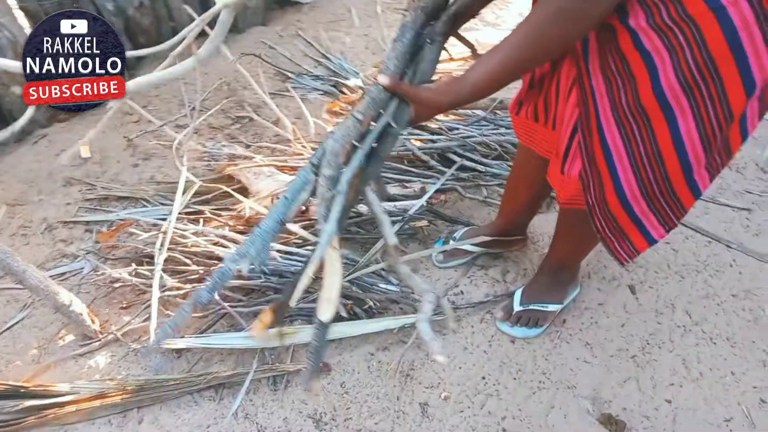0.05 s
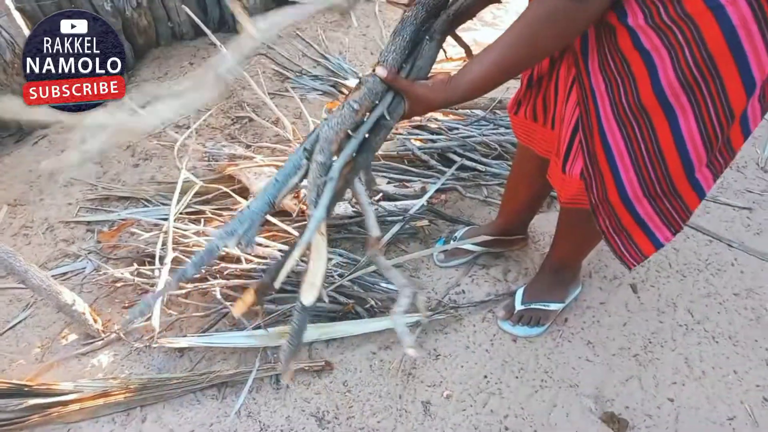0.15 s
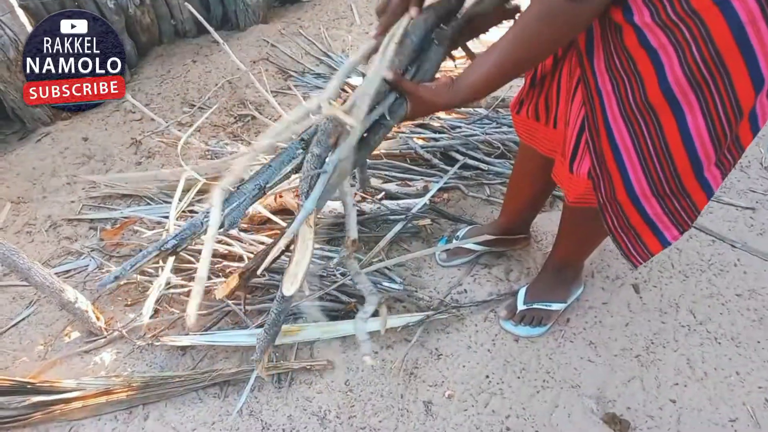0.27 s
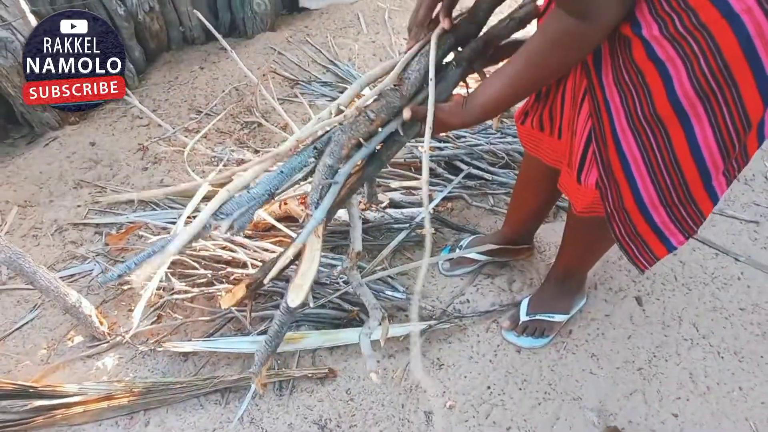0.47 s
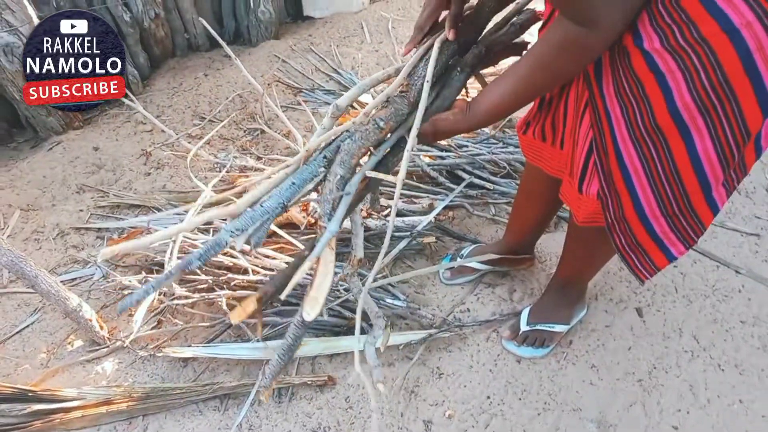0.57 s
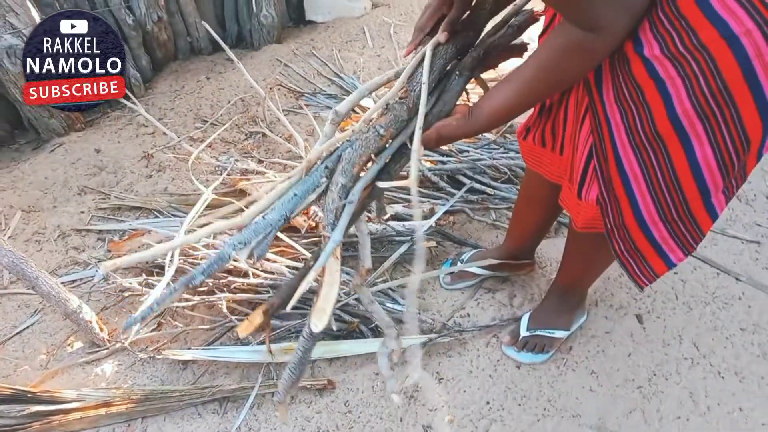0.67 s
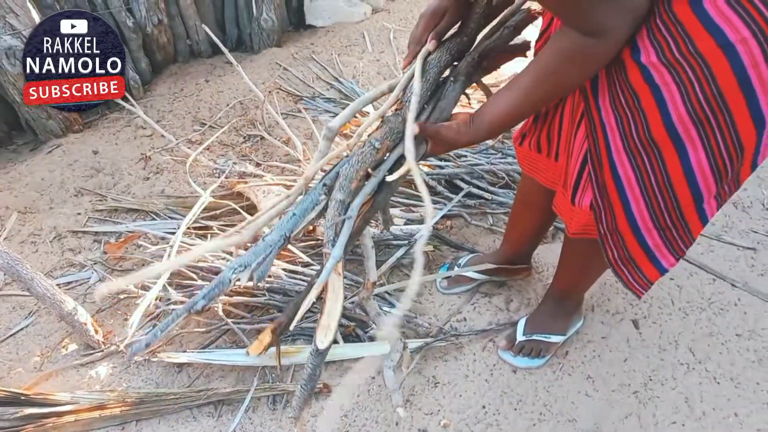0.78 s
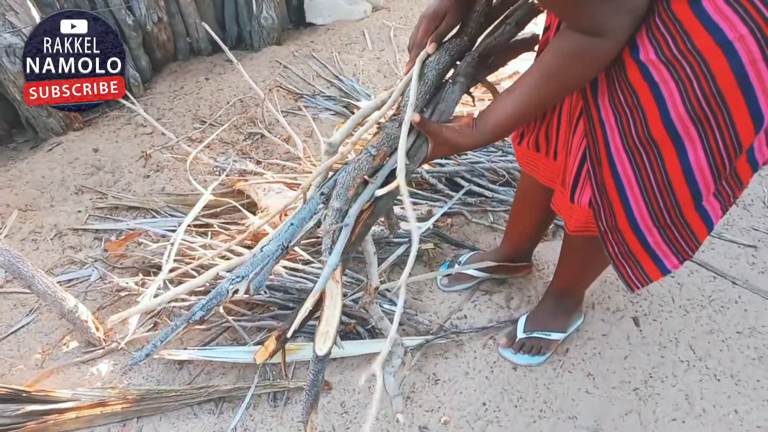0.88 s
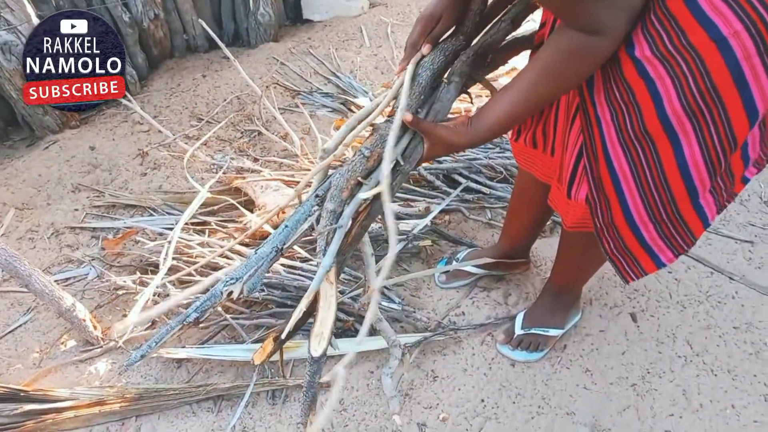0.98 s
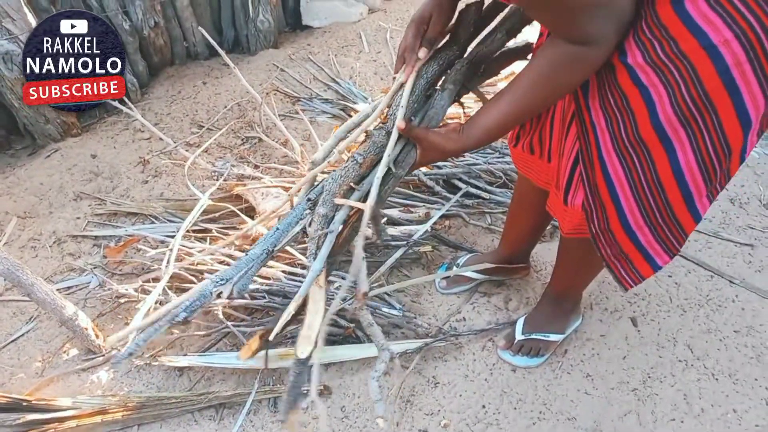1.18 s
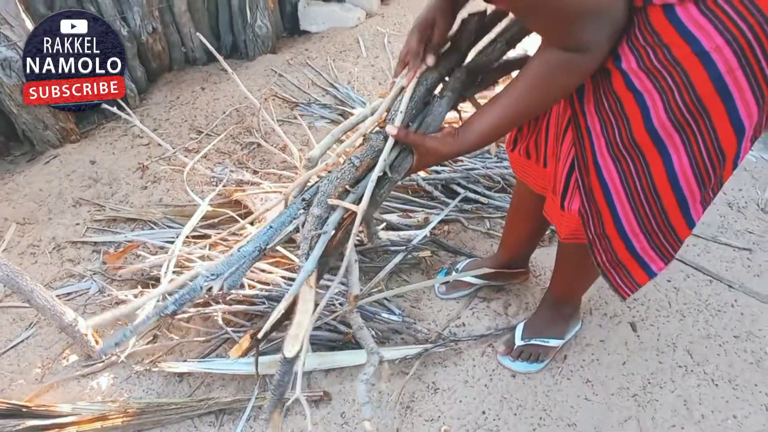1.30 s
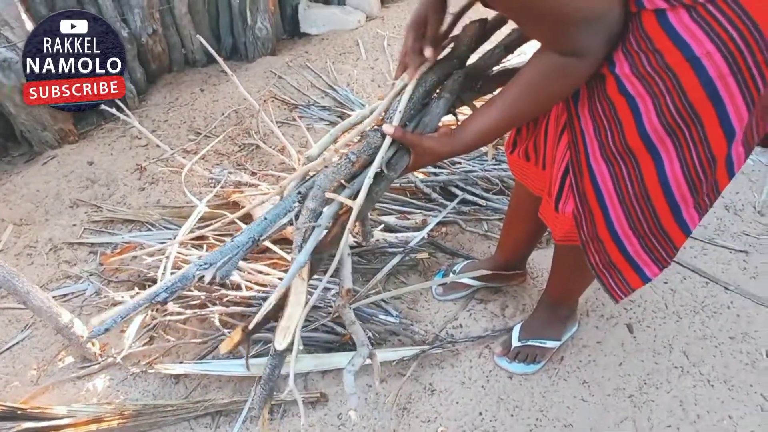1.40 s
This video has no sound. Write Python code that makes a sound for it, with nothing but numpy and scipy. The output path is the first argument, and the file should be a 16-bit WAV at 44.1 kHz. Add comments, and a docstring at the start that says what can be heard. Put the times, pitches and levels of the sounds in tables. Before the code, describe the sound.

Firewood sticks knock and scrape together in a short burst outdoors. Afterwards thin twigs tick and rustle quietly, with dull scuffs on sandy ground and a last light knock, while wind buffets the microphone.

```python
"""Dry firewood sticks are gathered into a bundle in an open yard, over a faint outdoor hiss.
Twigs rustle and the sandy ground is scuffed. At 0.22 s a sharp clack, then a quick clatter and scrape
as the sticks settle: each knock cracks and rings the wood's modes, sliding bark catches in tiny grains.
From 0.33 s a breeze buffets the microphone with low thumps. Twigs tick and rustle on, with dull scuffs
at 0.84 and 1.22 s and a last light knock at 1.31 s."""
import sys
import numpy as np
from scipy import signal
from scipy.fft import rfft, irfft, next_fast_len
from scipy.io import wavfile
from scipy.ndimage import uniform_filter1d, map_coordinates

SR = 44100
rng = np.random.default_rng(int(sys.argv[2]) if len(sys.argv) > 2 else 0)


def digitize_waveform(pressure):
    """Quantize a signal to 16-bit integers and store it at the path in sys.argv[1].

    Rows of a 2-D input are taken as channels; values are limited to [-1, 1].
    """
    field = np.atleast_2d(pressure).T
    bounded = np.clip(field, -1, 1)
    quanta = np.round(bounded * 32767).astype(np.int16)
    wavfile.write(sys.argv[1], SR, quanta)


N = 63945
WOOD_WIDTH, TWIG_PAN_DB = 0.79, 5


def undb(db):
    """Decibels to gain."""
    return 10 ** (np.asarray(db) / 20)


def unit(x):
    """Scale to rms 1."""
    return x / np.sqrt(np.mean(x ** 2))


def unit_energy(x):
    """Scale each channel to energy 1."""
    return x / np.sqrt(np.sum(x ** 2, axis=-1, keepdims=True))


def blow(x):
    """Scale each channel to the energy of 10 ms at rms 1."""
    return unit_energy(x) * np.sqrt(SR / 100)


def clock():
    """Sample times in s."""
    return np.arange(N) / SR


def curve(points):
    """Gain over time from (time [s], level [dB]) points."""
    return undb(np.interp(clock(), *np.array(points).T))


def fade(t, t60_s):
    """Exponential decay from t = 0."""
    return (t >= 0) * np.exp(-np.log(1000) * np.maximum(t, 0) / t60_s)


def colour(x, points):
    """Minimum-phase filter through (frequency [Hz], gain [dB]) points; -18 dB/octave outside."""
    hz, db = np.array(points).T
    size = 2 * next_fast_len(N)
    octave = np.log2(np.maximum(np.arange(size // 2 + 1) * SR / size, 1))
    outside_oct = np.maximum(np.log2(hz[0]) - octave, octave - np.log2(hz[-1]))
    gain_db = np.interp(octave, np.log2(hz), db) - 18 * np.clip(outside_oct, 0, 4)
    cepstrum = irfft(np.log(undb(gain_db)))
    cepstrum[1:size // 2] *= 2
    cepstrum[size // 2 + 1:] = 0
    return irfft(rfft(x, size) * np.exp(rfft(cepstrum)))[..., :N]


def convolve(x, response):
    """Apply an impulse response."""
    return signal.fftconvolve(x, response, axes=-1)[..., :N]


def spread(pair, width=WOOD_WIDTH):
    """Mid/side to left/right; width is the side gain."""
    return pair[0] + width * pair[1] * np.array([[1], [-1]])


def pan(db):
    """Gains favouring the left by db."""
    return undb(np.array([[db], [-db]]) / 2)


def noise():
    """Two independent white noises."""
    return rng.standard_normal((2, N))


def add(out, x, start_s):
    """Mix x into out from start_s."""
    i = int(np.clip(start_s * SR, 0, N - 1))
    out[:, i:] += x[:, :N - i]


def patchy(x, depth_db, patch_s=.05, patch_hz=900, size=512):
    """The colour of rubbing wanders as different twigs touch: random gain per time-frequency patch."""
    spectrum = signal.stft(x, nperseg=size)[2]
    field = rng.standard_normal(spectrum.shape[1:])
    for _ in range(2):
        field = uniform_filter1d(field, int(patch_hz * size / SR), axis=0)
        field = uniform_filter1d(field, int(patch_s * SR * 2 / size), axis=1)
    return signal.istft(spectrum * undb(depth_db * unit(field)), nperseg=size)[1][:, :N]


def friction(spectrum, grains_per_s=2000, patch_db=3.5, scatter_db=1.5, grain_t60_s=.007):
    """Rough surfaces rub in dense tiny catches, a few stronger, each a puff of noise."""
    catches = rng.random(N) < grains_per_s / SR
    strength = undb(scatter_db * np.minimum(rng.exponential(size=N), 5))
    power = convolve((catches * strength) ** 2, fade(clock(), grain_t60_s) ** 2)
    grains = patchy(noise() * np.sqrt(np.abs(power)), patch_db)
    return spread(unit(colour(grains, spectrum)))


def air(level_db=-74.5):
    """Faint steady outdoor hiss."""
    # hiss spectrum (frequency [Hz], gain [dB])
    spectrum = [(100, 0.5), (400, -24.5), (1000, -22), (2500, -21.5), (5000, -31), (8000, -47),
                (12500, -45), (16000, -58)]
    return undb(level_db) * spread(unit(colour(noise(), spectrum)), width=1)


def wind(eddy_sigma_cycles=0.52, skew_rad=0.5):
    """Low turbulence on the microphone ports; single eddies thump, out of step between the ports."""
    # breeze strength (time [s], level [dB])
    breeze = [(0, -72), (.05, -66.5), (.13, -63.5), (.17, -72), (.26, -68), (.31, -64), (.335, -41.5),
              (.36, -56.5), (.39, -49), (.43, -53.5), (.475, -38), (.56, -39.5), (.62, -44), (.65, -61),
              (.715, -68), (.75, -43), (.87, -47.5), (.95, -53), (1.08, -51.5), (1.13, -61.5),
              (1.23, -65.5), (1.26, -69), (1.32, -58.5), (1.41, -62.5), (1.449, -50.5)]
    # turbulence spectrum (frequency [Hz], gain [dB])
    spectrum = [(15, -49.5), (25, -20), (83, 0), (126, -6), (288, -17), (407, -30.5), (560, -35.5),
                (697, -49), (900, -58), (1170, -67), (1980, -120)]
    # eddies (time [s], peak [dB], pitch [Hz])
    eddies = [(0.049, -53, 85), (0.334, -36, 110), (.46, -37, 109), (0.487, -31, 80), (0.515, -30, 188),
              (0.561, -22.5, 113.6), (0.582, -35, 255), (0.62, -28.5, 96.4), (0.769, -25.5, 123),
              (.770, -40, 351), (0.861, -31.5, 133), (0.886, -41.5, 249), (.923, -39, 175),
              (0.979, -32, 115.6), (1.049, -34.5, 90.7), (1.088, -40.5, 134), (1.163, -39.5, 94.4),
              (1.293, -45, 95)]
    out = spread(unit(colour(noise(), spectrum)), width=0.88) * curve(breeze)
    for at_s, peak_db, hz in eddies:
        cycles = (clock() - at_s) * hz
        envelope = np.exp(-.5 * (cycles / eddy_sigma_cycles) ** 2)
        phase_rad = 2 * np.pi * rng.random() + skew_rad * rng.choice([-1, 1]) * np.array([[1], [-1]])
        out += undb(peak_db) * envelope * np.sin(2 * np.pi * cycles + phase_rad)
    return out * pan(-3)


def yard_echo(x, level_db=-8, delay_s=0.0065, t60_s=0.13):
    """Short, thin scatter from the ground and a log fence."""
    # echo spectrum (frequency [Hz], gain [dB])
    spectrum = [(200, -15.5), (1000, 3.5), (5000, -3.5), (8000, -10), (16000, 6.5)]
    tail = colour(noise() * fade(clock() - delay_s, t60_s), spectrum)
    return undb(level_db) * convolve(x, unit_energy(tail))


def sand_scuffs():
    """Dull friction over sandy ground, swelling and dying away."""
    # scuffs (peak time [s], level [dB], attack [s], t60 [s])
    scuffs = [(0.015, -62.5, 0.03, 0.22), (0.136, -61, 0.01, .28), (0.835, -54.5, 0.0063, 0.14),
              (1.217, -65, 0.0086, 0.24)]
    # scuff spectrum (frequency [Hz], gain [dB])
    spectrum = [(300, 16), (450, 22), (750, 12.5), (1100, 13.5), (1800, 15), (4000, 4.5), (16000, -20)]
    t, envelope = clock(), np.zeros(N)
    for at_s, level_db, attack_s, t60_s in scuffs:
        swell = np.exp(-np.abs(t - at_s) / attack_s)
        envelope += undb(level_db) * np.where(t < at_s, swell, fade(t - at_s, t60_s))
    return friction(spectrum) * envelope


def bundle_rustle():
    """Twigs rub in the carried bundle: fine, dense grains."""
    # rustle strength (time [s], level [dB])
    levels = [(0, -65.5), (.09, -70), (.14, -61.5), (.21, -70.5), (.5, -63.5), (.63, -64.5), (.66, -67.5),
              (.75, -78), (.78, -67), (.86, -68), (.94, -76.5), (1.0, -65.5), (1.09, -64), (1.125, -74),
              (1.155, -61), (1.19, -76), (1.23, -65), (1.29, -81.5), (1.32, -69), (1.39, -75), (1.45, -64)]
    # twig spectrum (frequency [Hz], gain [dB])
    spectrum = [(400, 3), (900, -15), (1300, 1), (2000, -9.5), (3500, 1.5), (5300, 3), (7000, 1),
                (8200, -8.5), (11500, -1), (16000, -5.5)]
    return friction(spectrum, grains_per_s=6000, patch_db=1.2) * curve(levels) * pan(TWIG_PAN_DB)


def twig_ticks():
    """Thin twigs flick against each other: brief bright noise bursts."""
    # flicks (time [s], level [dB], t60 [s])
    ticks = [(0.235, -55.5, 0.02), (0.3441, -53.5, 0.013), (0.408, -62, 0.017), (0.506, -71, 0.015),
             (0.519, -74, 0.011), (0.534, -61, 0.017), (0.627, -59.5, 0.036), (0.99, -66.5, 0.014),
             (1.155, -64.5, 0.027), (1.274, -70.5, 0.006), (1.402, -70, 0.0074), (1.435, -64, 0.013)]
    # tick spectrum (frequency [Hz], gain [dB])
    spectrum = [(1000, -5), (3000, 3.5), (5200, 18.5), (8000, 7), (10800, 10.5), (16000, -7)]
    out = np.zeros((2, N))
    for start_s, level_db, t60_s in ticks:
        burst = colour(noise() * fade(clock(), t60_s), spectrum)
        add(out, undb(level_db) * spread(blow(burst)), start_s)
    return out * pan(TWIG_PAN_DB)


def bark_scrape():
    """Bark slides over bark as the sticks settle."""
    # scrape strength (time [s], level [dB])
    levels = [(.222, -110), (.232, -57), (.258, -53.5), (.272, -46.5), (.308, -46), (.322, -49),
              (.338, -67), (.362, -47.5), (.41, -57.5), (.435, -54), (.45, -50.5), (.5, -61), (.58, -70),
              (.69, -70), (.75, -91), (.79, -87), (.85, -67.5), (.95, -79.5), (1.02, -67.5), (1.09, -68),
              (1.14, -78)]
    # bark spectrum (frequency [Hz], gain [dB])
    spectrum = [(250, -5), (600, 0), (1100, -4), (1900, -4.5), (2400, -2.5), (4400, -3.5), (5400, -1.5),
                (6500, -18.5), (8200, -19), (11000, -22.5), (16000, -19)]
    return friction(spectrum) * curve(levels)


def stick_ring(pitch_hz, width_oct, t60_scale, detune=0.01, rise_s=.0003):
    """Mid/side ringing of a stick's modes around its pitch; the wood gives, so the ring builds up."""
    # stick modes (frequency [Hz], level [dB], t60 [s])
    modes = [(447, 1, 0.029), (841, -16, 0.23), (1079, -0.5, 0.06), (1342, 2, 0.11), (1790, 3, 0.14),
             (2233, 3, 0.061), (2410, 5.5, 0.13), (2770, 0.5, 0.12), (3247, -2.5, 0.14), (3600, 4, 0.088),
             (3876, 5.5, 0.072), (4580, 5, 0.09), (5004, 10, 0.094), (6000, 6.5, 0.032)]
    mode_hz, mode_db, t60_s = np.array(modes).T[:, :, None]
    t = clock()[:N // 8]
    chance = rng.standard_normal((3, len(modes), 1))
    tuning, polarity = 1 + detune * chance[0], np.sign(chance[1:])
    # stick size: all modes shift until the nearest lies on the pitch
    hz = mode_hz * pitch_hz / mode_hz[np.argmin(np.abs(mode_hz - pitch_hz))]
    weight = undb(mode_db) * np.exp(-.5 * (np.log2(hz / pitch_hz) / width_oct) ** 2)
    swing = polarity * np.sin(2 * np.pi * hz * tuning * t)
    ring = np.sum(weight * fade(t, t60_s * t60_scale) * swing, axis=1)
    return ring * (1 - np.exp(-t / rise_s))


def stick_knocks(chatter=0.86):
    """Stick hits stick: each rough contact cracks and rings the wood; a tightly held stick dies sooner."""
    # knocks (time [s], level [dB], pitch [Hz], mode spread [oct], contact [s], t60 scale [x], crack [dB])
    knocks = [(0.2256, -39, 4840, 0.24, 0.0008, 0.12, 0), (0.2269, -59.5, 940, 0.18, 0.0014, 0.69, -13),
              (0.2275, -41.5, 4950, 0.19, 0.0017, 0.15, -7), (0.2274, -41, 3460, 0.24, 0.00075, 0.33, -5.5),
              (0.2570, -55.5, 4980, 0.1, 0.0013, 0.35, -8),
              (0.2662, -44.5, 3605, 0.097, 0.00089, 0.22, -15),
              (0.2687, -50.5, 1248, 0.42, 0.0032, 0.59, -16), (0.27, -45.5, 2988, 0.24, 0.00078, 0.44, -14),
              (0.2842, -42, 3830, 0.13, 0.00027, 0.38, -12), (0.2865, -43.5, 2194, 0.33, 0.0014, 0.52, -16),
              (0.2922, -46.5, 4900, 0.062, 0.00045, 0.31, -14),
              (0.2931, -49.5, 846, 0.58, 0.0016, 0.78, 0.5), (0.2989, -40, 5310, 0.16, 0.00015, 0.099, -8),
              (0.3083, -51.5, 1081, 0.39, 0.0016, 0.52, -14),
              (0.3096, -51, 5760, 0.074, 0.0048, 0.47, -0.5), (0.3438, -54, 6070, 0.17, 0.0014, 0.39, 1),
              (0.3525, -55.5, 5420, 0.1, 0.0046, 0.93, -0.5), (0.357, -55.5, 500, 0.3, 0.0025, 1.9, -16),
              (0.3605, -46, 3236, 0.2, 0.0016, 0.25, -3), (0.3787, -44.5, 2398, 0.42, 0.0013, 0.33, -9),
              (0.3839, -47.5, 2460, 0.13, 0.00089, 0.42, -20), (0.39, -50, 1028, 0.2, 0.014, 1, -12),
              (0.4232, -52.5, 4210, 0.32, 0.00058, 0.3, 0.5), (0.44, -54, 3820, 0.2, 0.001, 0.38, -12),
              (0.442, -46, 2425, 0.3, 0.00096, 0.3, -12), (0.524, -59, 1770, 0.29, 0.0056, 0.1, -21.5),
              (1.3127, -60, 3470, 0.39, 0.0012, 0.24, -4)]
    # crack spectrum (frequency [Hz], gain [dB])
    spectrum = [(300, -9), (900, -2), (1700, -7.5), (3000, -1.5), (5500, 6.5), (7000, -12.5), (8300, -20),
                (10500, -4.5), (14000, -3), (16000, -8.5)]
    t, out = clock(), np.zeros((2, N))
    crack_envelope = fade(t, t60_s=0.04) + undb(-12) * fade(t, t60_s=0.034)
    for start_s, level_db, pitch_hz, width_oct, contact_s, t60_scale, crack_db in knocks:
        ring = stick_ring(pitch_hz, width_oct, t60_scale)
        force = chatter * unit_energy(noise() * np.exp(-t / contact_s))
        force[:, 0] += 1  # clean impact ahead of the chatter
        body = spread(blow(convolve(force, ring)))
        burst = colour(noise() * crack_envelope, spectrum)
        crack = undb(crack_db) * spread(blow(burst)) * pan(3)
        add(out, undb(level_db) * (body + crack), start_s)
    return out


def scene(right_lag_s=.00011):
    """Sticks and scuffs a little to the left, their echo, breeze and air."""
    left, right = stick_knocks() + twig_ticks() + bark_scrape() + bundle_rustle() + sand_scuffs()
    late_right = map_coordinates(right, [np.arange(N) - right_lag_s * SR], order=3)
    direct = np.array([left, late_right])
    return direct + yard_echo(direct) + wind() + air()


def record(dry, cutoff_hz=15850):
    """Steep elliptic low-pass."""
    return signal.sosfilt(signal.ellip(10, .2, 80, cutoff_hz, fs=SR, output="sos"), dry)


dry = scene()
out = record(dry)
digitize_waveform(out)
```